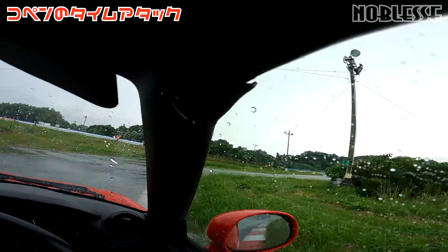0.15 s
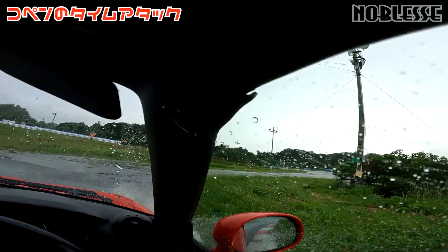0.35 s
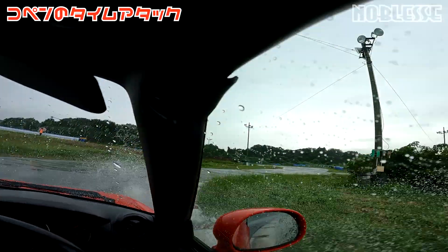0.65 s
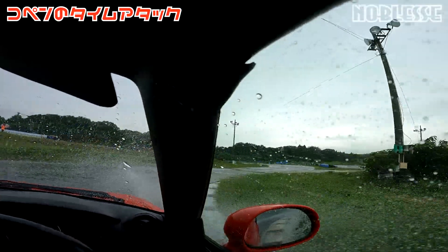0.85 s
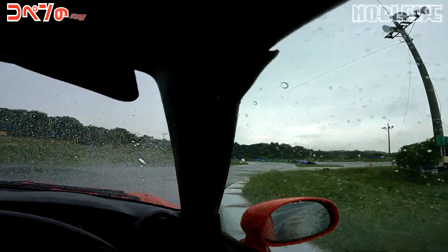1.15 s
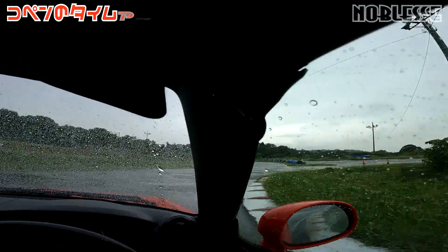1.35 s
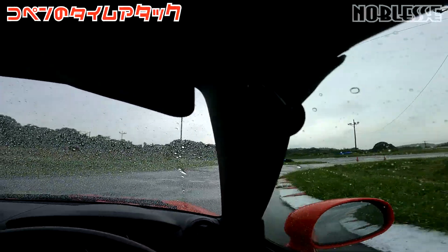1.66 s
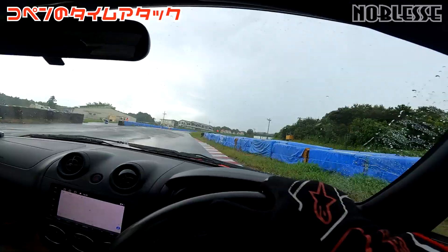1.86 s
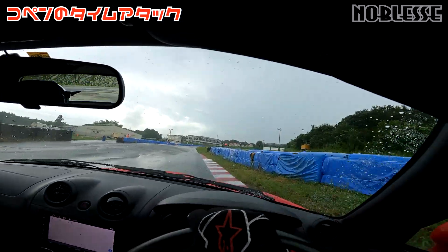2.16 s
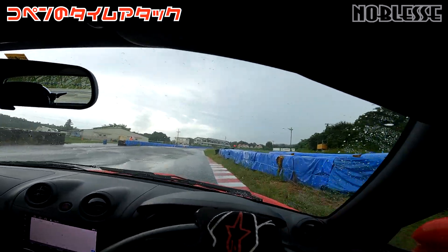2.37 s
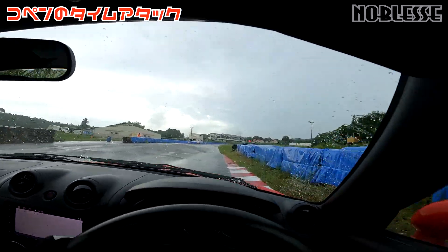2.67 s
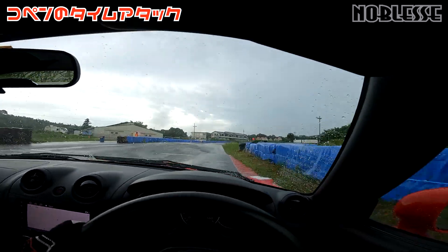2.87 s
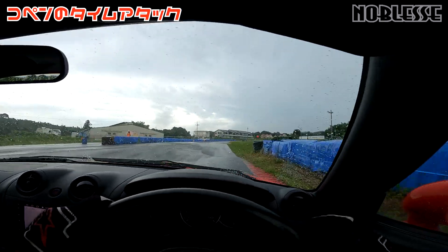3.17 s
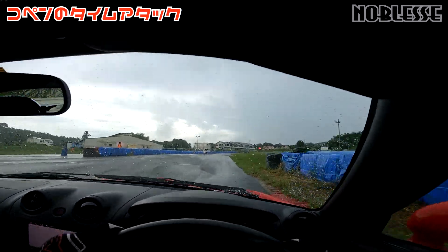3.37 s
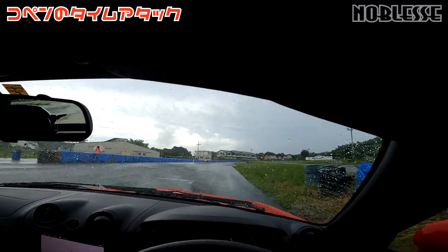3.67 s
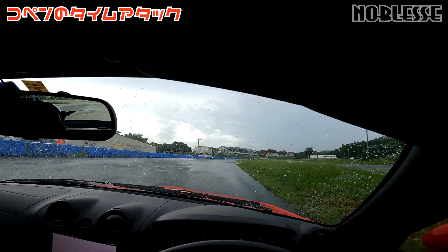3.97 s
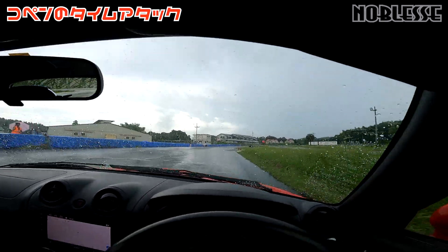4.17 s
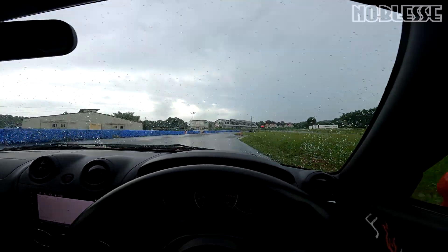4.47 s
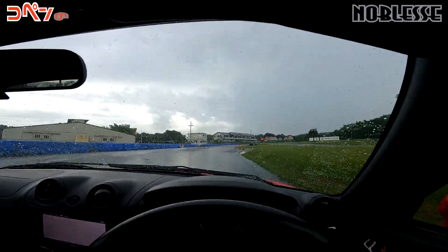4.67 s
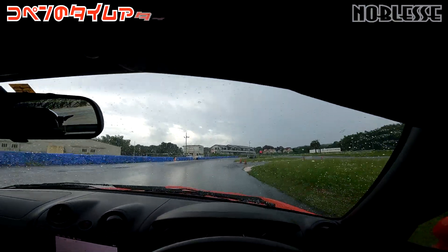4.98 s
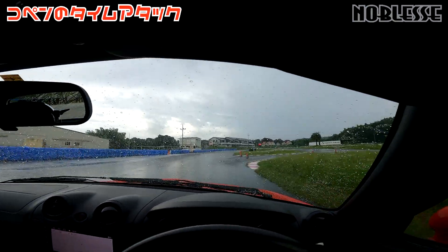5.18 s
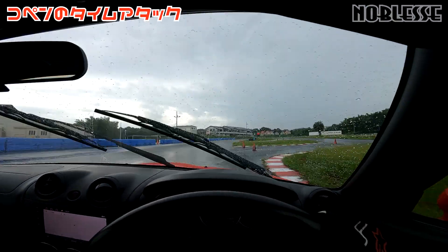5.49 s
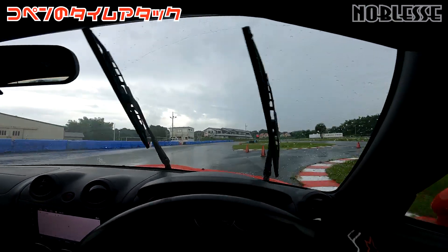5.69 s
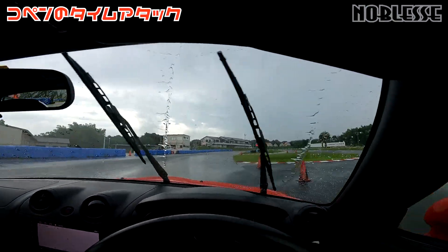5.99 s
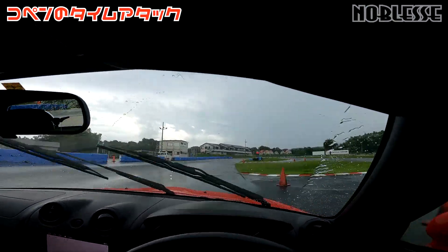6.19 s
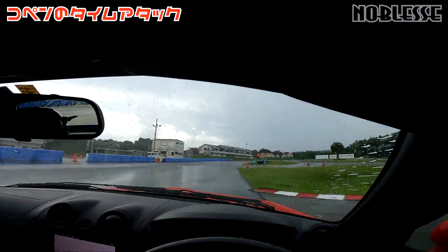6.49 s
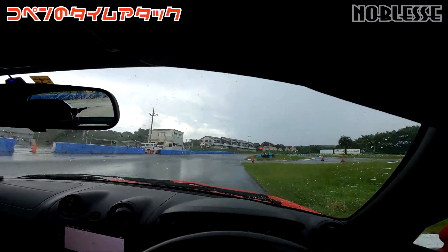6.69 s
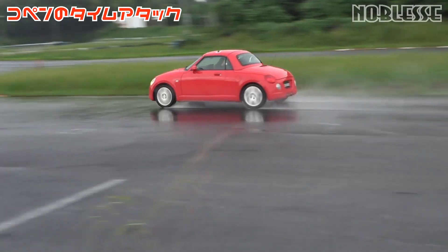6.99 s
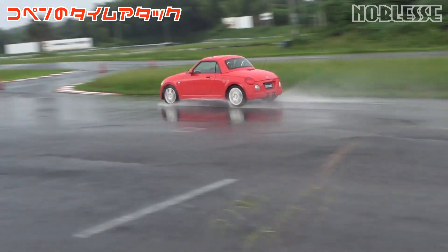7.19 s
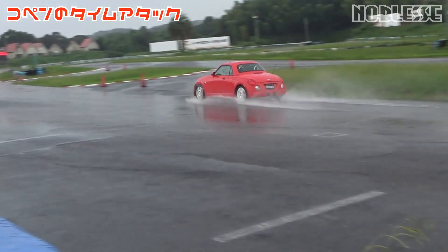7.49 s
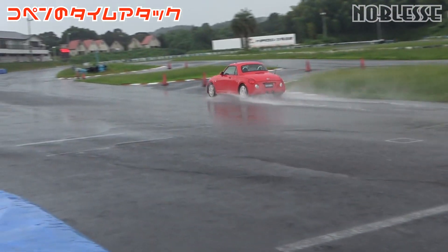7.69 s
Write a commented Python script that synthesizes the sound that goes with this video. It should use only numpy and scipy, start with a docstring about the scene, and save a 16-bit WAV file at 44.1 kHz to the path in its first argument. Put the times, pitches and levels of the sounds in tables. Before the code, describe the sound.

Inside a small turbo car on a flooded track, bumps thud and water splatters, then the engine booms upward until the wheels slip and the driver lifts.

```python
"""Inside a small four-cylinder turbo car on a wet track. First it shudders through a corner along a flooded
verge: bumps thud, trim rattles, water bursts on arch and door. Then it pulls up through the revs, firing
harmonics booming at exhaust resonances and a gear mesh whining; the wiper knocks as it reverses. Last, the
wheels spin up in standing water and the driver lifts. Throughout, filtered noise makes tyre drumming, spray
and suspension thrum; impulses make drops."""
import sys
import numpy as np
from scipy import signal
from scipy.fft import rfft, irfft
from scipy.io import wavfile
from scipy.ndimage import uniform_filter1d

SR = 44100
rng = np.random.default_rng(int(sys.argv[2]) if len(sys.argv) > 2 else 0)


def wav_record(signal):
    """Record a signal, one row per channel, as 16-bit PCM in the file named by sys.argv[1]."""
    frames = np.transpose(np.atleast_2d(signal))
    bounded = np.clip(frames, -1, 1)
    # unit amplitude maps onto the largest positive 16-bit level
    quanta = np.round(bounded * 32767).astype(np.int16)
    wavfile.write(sys.argv[1], SR, quanta)


N = 346185
TIME = np.arange(N) / SR

# engine speed without wheelspin: time_s, firing_hz
ENGINE_SPEED = [(0, 164.5), (1.88, 160.6), (2.1, 166.2), (2.33, 169.2), (2.45, 174.8), (2.72, 180.3),
                (2.87, 175.8), (3.07, 155.1), (3.35, 162.1), (3.85, 174), (4.45, 186.6), (4.85, 195.7),
                (5.02, 199.1), (5.16, 201.4), (5.38, 205.4), (5.6, 208.8), (6.42, 222.3), (7.12, 235),
                (7.24, 219.7), (7.3, 225.5), (7.35, 220.5), (7.43, 210.8), (7.53, 207.8), (7.62, 200),
                (7.68, 171), (7.73, 159), (7.79, 161), (7.85, 170.3)]
# throttle: time_s, load_db
ENGINE_LOAD = [(0, -9), (1.9, -13), (2, -4.5), (2.4, -3.5), (3.2, 0.5), (7.15, 0), (7.27, -11.5),
               (7.35, -4.5), (7.45, -11), (7.62, 1), (7.65, -5), (7.72, -3), (7.85, -9.5)]
# firing rate and harmonics: order (multiple of four-stroke cycle rate), relative_db
FIRING_ORDERS = [(4, 0.5), (8, -3), (12, -5), (16, -17.5)]
# exhaust and cabin air resonances: freq_hz, gain_db
EXHAUST_RESPONSE = [(153, -29.5), (165, -19), (172, -21.5), (178, -16.5), (186, -21.5), (195, -37),
                    (200, -24.5), (208, -15.5), (216, -17), (223, -11.5), (234, -21.5), (310, -33.5),
                    (342, -33), (368, -37.5), (383, -26), (402, -24.5), (427, -25), (440, -32), (465, -31),
                    (505, -43), (520, -34), (550, -39), (572, -31.5), (598, -37), (622, -37.5), (645, -36),
                    (700, -37.5), (803, -45), (821, -24), (834, -21), (849, -24.5), (860, -37),
                    (880, -28.5), (920, -46.5)]
# weaker overtones from unequal cylinders: order, relative_db
UNEVEN_ORDERS = [(2, -20.5), (3, -31), (5, -37), (6, -41), (7, -30.5), (9, -44), (10, -40), (11, -43),
                 (13, -52), (14, -51)]
# cabin response through the engine mounts: freq_hz, gain_db
CABIN_RESPONSE = [(80, -26.5), (125, -12.5), (165, -5), (220, 2.5), (255, -2.5), (278, -16), (293, -14.5),
                  (303, 3.5), (312, 1.5), (325, 1), (338, 4.5), (347, -0.5), (362, -15.5), (377, -2.5),
                  (392, -0.5), (404, 2), (414, -0.5), (450, 1.5), (495, 5), (535, -1.5), (590, 4),
                  (640, -1), (835, -3)]
# orders swelling as the engine strains on its mounts and grip varies: middle_s, length_s, order, level_db
ORDER_SHUDDERS = [(2.45, 0.49, 7, -30), (3.45, 1.16, 14, -42.5), (3.95, 1.1, 11, -40), (4.1, 0.86, 7, -29),
                  (7.165, 0.15, 4, -17.5), (7.2, 0.29, 3, -24.5), (7.228, 0.034, 4, -10.5),
                  (7.343, 0.096, 6, -27), (7.537, 0.17, 6, -19), (7.576, 0.18, 4, -24),
                  (7.688, 0.057, 4, -21)]
# revs flare as the wheels slip (rise in firing rate)
SPIN_MIDDLE_S, SPIN_LENGTH_S, SPIN_RISE_HZ = 7.163, 0.1016, 25.94
SPEED_WAVER = .0011  # share of engine speed
RASP_DB, RASP_SWELL_DB = -52, 4.5  # faint high orders, before load and the 5 / order fall


def engine(boom_flutter_db=0.5, boom_rough_rad=0.025, growl_flutter_db=1.6, growl_rough_rad=0.0029):
    """Four firings a cycle boom in the exhaust; other orders swell as they cross cabin resonances."""
    firing_hz, = curves(ENGINE_SPEED)
    load = undb(curves(ENGINE_LOAD)[0])
    cycle_hz = (firing_hz + SPIN_RISE_HZ * hump(SPIN_MIDDLE_S, SPIN_LENGTH_S)) / 4
    phase = 2 * np.pi * np.cumsum(cycle_hz * (1 + SPEED_WAVER * walk(25))) / SR

    def line(order, rough_rad, gain):
        """One order, phase shaken by uneven combustion; its gain follows load, its shudders do not."""
        shudder = sum(undb(db) * hump(s, length_s) for s, length_s, k, db in ORDER_SHUDDERS if k == order)
        angle = order * phase + rough_rad * walk(30) + rng.uniform(0, 2 * np.pi)
        return np.sqrt(2) * np.sin(angle) * (gain * load + shudder)

    boom = 0
    for n, (order, db) in enumerate(FIRING_ORDERS, 1):
        flutter = undb(db + n * boom_flutter_db * walk(24))
        boom = boom + line(order, n ** 2 * boom_rough_rad, response(EXHAUST_RESPONSE, order * cycle_hz) * flutter)
    growl = 0
    for order, db in UNEVEN_ORDERS:
        flutter = undb(db + growl_flutter_db * walk(12))
        gain = response(CABIN_RESPONSE, order * cycle_hz) * flutter
        growl = growl + line(order, order ** 2 * growl_rough_rad, gain)
    # valves and combustion
    rasp = sum(line(k, 0.79, undb(RASP_DB + RASP_SWELL_DB * walk(3)) * 5 / k) for k in range(17, 30))
    return boom + growl + rasp, phase


# gearbox casing resonances: freq_hz, width_hz, level_db
CASING_MODES = [(1660, 110, -60), (1782, 24, -55), (1866, 38, -45), (1906, 32, -47), (2195, 60, -55)]
WHINE_DB, LIFT_S = -61, 7.25  # level off resonance at 0 dB load; middle of the fade as drive comes off
MESH_ROUGH_RAD = .28


def gearbox(phase, flutter_db=1.0, fade_s=.2):
    """A gear pair meshes 19 times a crank turn, unevenly; sings under load and at casing resonances."""
    load_db, = curves(ENGINE_LOAD)
    mesh = 38 * phase  # two crank turns a cycle
    mesh_hz = np.gradient(mesh) * SR / (2 * np.pi)
    casing = sum(undb(db) / (1 + (2 * (mesh_hz - hz) / width) ** 2) for hz, width, db in CASING_MODES)
    fade = np.clip((LIFT_S - TIME) / fade_s + .5, 0, 1)
    drive = fade * undb(load_db + flutter_db * walk(25))
    return np.sqrt(2) * np.sin(mesh + MESH_ROUGH_RAD * walk(60)) * (undb(WHINE_DB) + casing) * drive


# kerbs and rough track: middle_s, length_s, extra_rumble_db, extra_roar_db
ROUGH_TRACK = [(.33, 0.98, 4, 1.5), (0.78, 0.55, 3, 7), (1.15, 0.66, 2.5, 5.5), (1.844, 0.45, 3, 4),
               (2.498, 0.84, 4, 5.5), (3.813, 0.61, 0.5, 5.5), (4.8, 0.75, 1, 2), (5.5, 0.94, 5.5, 3.5),
               (6.119, 0.61, 5, 0.5), (7.0, 0.34, 1, 3.5), (7.23, 0.25, -2, 5), (7.54, 0.2, 5, 4.5)]
# smooth track at cruise: straight_db, extra_full_side_load_db
RUMBLE_DB, ROAR_DB = (-30, 6.5), (-29.5, -0.5)
CRUISE_HZ, DB_PER_DOUBLING = 195, 3  # firing rate where those levels hold; rise with speed


def road():
    """Rumble and roar levels in dB: speed, side load and rough patches shift them."""
    speed_db = DB_PER_DOUBLING * np.log2(curves(ENGINE_SPEED)[0] / CRUISE_HZ)
    rumble_db = speed_db + cornering_db(*RUMBLE_DB)
    roar_db = speed_db + cornering_db(*ROAR_DB)
    for s, length_s, extra_rumble_db, extra_roar_db in ROUGH_TRACK:
        patch = hump(s, length_s)
        rumble_db = rumble_db + extra_rumble_db * patch
        roar_db = roar_db + extra_roar_db * patch
    return rumble_db, roar_db


# body panels: freq_hz, width_hz, relative_db, extra_full_side_load_db
PANEL_MODES = [(72, 29, -13.5, -3.5), (111.2, 23, -4, 9), (143.5, 30, -8, 4.5), (189.4, 42, -2, -3)]
# panels and cabin air, higher: freq_hz, width_hz, relative_db, extra_full_side_load_db
CABIN_AIR_MODES = [(249.5, 63, -0.5, 3.5), (320, 46, -2.5, 6.5), (387.6, 68.5, -3, 0), (490, 49, -8, -2.5),
                   (591, 68, -12, -9), (847, 61, -18.5, -1)]


def tyres(rumble_db, roar_db):
    """Road texture drives broad body and cabin resonances: low rumble, higher roar."""
    rumble = resonate(PANEL_MODES, sway_db=0.5) * undb(rumble_db)
    roar = resonate(CABIN_AIR_MODES, sway_db=2.5) * undb(roar_db)
    return rumble + roar


# water thrown by the tyres: time_s, level_db
WATER_FLOW = [(0, -45.5), (.5, -42), (1.2, -40.5), (1.3, -44.5), (2, -43.5), (2.9, -40.5), (3.6, -39),
              (4.3, -41), (5.4, -36), (6.6, -38), (7.1, -36.5), (7.85, -38)]
# spray through floor and glass: freq_hz, relative_db
SPRAY_SPECTRUM = [(300, -5), (600, 8.5), (950, 4.5), (1400, 2.5), (2000, 2), (2350, -0.5), (3600, -3.5),
                  (5000, -12), (7000, -20), (8300, -28.5), (9100, -36.5), (11100, -24.5), (12200, -36),
                  (12800, -38), (13500, -43)]


def spray(flicker_db=0.77, grain_db=-6, grain_spread_db=2.5, drops_per_s=2500):
    """Thrown water: a mist of hiss with dense droplets, its level flickering."""
    grain = unit(patter(drops_per_s, grain_spread_db))
    water = unit(colour(noise() + undb(grain_db) * grain, SPRAY_SPECTRUM))
    return water * undb(curves(WATER_FLOW)[0] + flicker_db * walk(45))


# suspension bumps: start_s, peak_db, strongest_hz
BUMP_EVENTS = [(.045, -15, 160), (.208, -14, 170), (.243, -14, 150), (.286, -10, 180), (.352, -14, 200),
               (.408, -10.5, 150), (.497, -10.5, 190), (0.517, -10.5, 120), (.595, -14, 160),
               (.658, -8, 410), (.701, -13, 280), (0.735, -16, 250), (.772, -11, 230), (.815, -9.5, 350),
               (0.891, -20, 115), (0.924, -9, 190), (1.018, -14, 100), (1.058, -16, 360),
               (1.109, -8.5, 200), (1.158, -9, 200), (1.179, -4.5, 230), (1.191, -7.5, 100),
               (1.319, -10, 210), (1.855, -11.5, 230), (7.259, -9, 310), (7.614, -14, 140)]
# body modes: freq_hz, relative_db, t60_s
THUD_MODES = [(119, -4, 0.13), (200, 4, 0.087), (328, 4.5, 0.1), (393, 2.5, 0.048), (500, -12, .05),
              (634, -16, 0.018)]
BUMP_FALL_DB_PER_OCTAVE = 16.5  # modes away from strongest_hz


def bumps():
    """Suspension blows thud through the body, each favouring modes near its own frequency."""
    out = np.zeros(N)
    for s, db, strongest_hz in BUMP_EVENTS:
        modes = []
        for hz, mode_db, t60_s in THUD_MODES:
            octaves = abs(np.log2(hz / strongest_hz))
            modes.append((hz, mode_db - BUMP_FALL_DB_PER_OCTAVE * octaves, t60_s))
        add(out, s, undb(db) * ring(modes, push_s=0.00033, grit=.3))
    return out


# hollow knocks: chassis clonks, and the wiper reversing at 5.936 s: start_s, peak_db
HOLLOW_KNOCKS = [(.663, -20), (5.936, -22.5), (7.551, -22), (7.667, -22)]
# their modes: freq_hz, relative_db, t60_s
HOLLOW_MODES = [(528, 1, .1), (723, 9, 0.11), (822, 2.5, 0.17)]


def hollow_knocks():
    """Chassis clonks and a wiper reversal: gritty short contacts ring hollow modes."""
    out = np.zeros(N)
    for s, db in HOLLOW_KNOCKS:
        add(out, s, undb(db) * ring(HOLLOW_MODES, push_s=0.0014, grit=3.3))
    return out


# loose trim: freq_hz, relative_db, t60_s
TRIM_RING = [(1000, -15, .015), (1395, 8, 0.041), (1610, 2.5, 0.028), (2056, 4, 0.033), (2505, -5, 0.025),
             (2850, -7, .02)]
TRIM_TILT_DB, TRIM_EVEN = 21, 0.23  # dB/octave per unit brightness; brightness with no tilt


def trim(bright):
    """Trim modes for one contact: brightness favours high modes; each mode's force varies randomly."""
    tilt_db = TRIM_TILT_DB * (bright - TRIM_EVEN)  # per octave
    lowest_hz = TRIM_RING[0][0]
    return [(hz, db + tilt_db * np.log2(hz / lowest_hz) + 2 * rng.standard_normal(), t60_s)
            for hz, db, t60_s in TRIM_RING]


# trim knocks: start_s, peak_db, brightness (0-1)
RATTLE_EVENTS = [(.459, -29.5, .2), (.516, -33, .2), (.563, -32, .1), (.583, -33, .5), (.625, -36, 0.66),
                 (.841, -32, .1), (0.867, -23, 0.33), (.896, -30, .2), (.936, -26.5, .1), (1.075, -32, .3),
                 (1.194, -29, 0.45), (1.223, -35, .3), (1.309, -34, .25), (1.365, -33, .3),
                 (1.663, -35, 0.23)]


def rattles():
    """Loose trim chatters: longer, scraping contacts ring its modes."""
    out = np.zeros(N)
    for s, db, bright in RATTLE_EVENTS:
        add(out, s, undb(db) * ring(trim(bright), push_s=0.0033, grit=3.9))
    return out


# a wheel runs along the flooded verge
VERGE_MIDDLE_S, VERGE_LENGTH_S, VERGE_WATER_DB = 0.68, 1.34, -46.5


def trim_buzz(rumble_db, taps_per_s=50, below_rumble_db=-24):
    """Four loose panels tap lightly along the verge, each at its own pitch; level follows body rumble."""
    taps = 0
    for _ in range(4):
        panel = ring(trim(TRIM_EVEN), push_s=0.0015, grit=4)
        taps = taps + signal.oaconvolve(patter(taps_per_s, spread_db=0.5), panel)[:N]
    return unit(taps) * undb(rumble_db + below_rumble_db) * np.sqrt(hump(VERGE_MIDDLE_S, VERGE_LENGTH_S))


# clots bursting on wheel arch and door: freq_hz, relative_db
SPLATTER_SPECTRUM = [(300, -11), (700, 0), (1500, 9.5), (2800, -4), (4000, -5), (6000, -15), (8300, -29),
                     (11000, -18), (13000, -38)]
# deeper puddles washing up the door: middle_s, length_s, level_db
PUDDLE_SURGES = [(.54, 0.28, -42.5), (0.676, .1, -47), (.9, 0.15, -44), (1.18, 0.21, -40)]
# surge on the door skin: freq_hz, relative_db
WASH_SPECTRUM = [(300, -6), (600, 5), (900, 3.5), (1500, -1.5), (2500, -4), (4000, -10), (7000, -27),
                 (13000, -50)]
SHOWER_PER_S = 7000  # droplets


def splatter(clots_per_s=75, clot_s=0.0049, drizzle=.4, wash_drizzle=.9):
    """Verge water bursts in quick, uneven droplet showers; deeper puddles add a fuller wash."""
    t = TIME[:SR // 12]
    starts = np.abs(patter(clots_per_s, spread_db=5.0))
    clots = unit(signal.oaconvolve(starts, t / clot_s * np.exp(-t / clot_s))[:N])
    droplets = patter(SHOWER_PER_S, spread_db=0.5)
    showers = unit(colour(droplets * (drizzle + clots), SPLATTER_SPECTRUM))
    verge = undb(VERGE_WATER_DB) * np.sqrt(hump(VERGE_MIDDLE_S, VERGE_LENGTH_S))
    surge = sum(undb(db) * hump(s, length_s) for s, length_s, db in PUDDLE_SURGES)
    wash = unit(colour(patter(SHOWER_PER_S, spread_db=2.0) * (wash_drizzle + clots), WASH_SPECTRUM))
    return showers * verge + surge * wash


# sheets of water on the floor: start_s, level_db
SLAP_EVENTS = [(.43, -45), (.476, -46), (.52, -40), (.556, -38), (.575, -41), (.598, -38), (0.619, -39),
               (.708, -41), (.66, -49), (.868, -43), (.94, -46), (1.12, -40), (1.165, -43), (1.19, -42),
               (1.222, -43), (7.456, -33), (7.489, -34), (7.506, -30), (7.551, -34.5), (7.667, -39)]


def slaps(slap_s=0.005):
    """Sheets of water slap the floor: spray-coloured noise, fast rise and decay."""
    t = TIME[:SR // 12]
    level = np.zeros(N)
    for s, db in SLAP_EVENTS:
        add(level, s, undb(db) * t / slap_s * np.exp(1 - t / slap_s))
    return level * unit(colour(noise(), SPRAY_SPECTRUM))


# largest drops and grit: start_s, level_db (before drop_trim_db)
LARGE_DROPS = [(.432, -34), (.577, -31), (1.367, -39), (1.434, -35), (2.242, -42), (3.303, -31),
               (3.318, -34), (3.592, -36), (4.004, -38), (4.103, -36), (4.259, -36), (4.36, -37),
               (4.466, -33), (4.785, -38), (5.028, -36), (5.799, -36), (6.055, -31), (6.407, -31),
               (6.628, -35), (7.174, -34), (7.514, -31), (7.667, -31.5)]
# single drop or grain on the wheel arch: freq_hz, relative_db
DROP_SPECTRUM = [(500, -8), (1500, 2.5), (3800, 7.5), (7000, -4.5), (8400, -10), (9100, -15.5),
                 (11000, -6.5), (12200, -20), (13000, -17.5), (15000, -32.5)]
SMALL_DROP_DB = -52  # smallest drops at mean flow, before colouring
SATELLITES_PER_S, SCATTER_S = 6000, .007  # droplets from a broken drop; their decay


def drops(spatter=1.0, drop_trim_db=-1, small_per_s=70):
    """Drops tick on the wheel arches and burst into satellite droplets."""
    t = TIME[:SR // 12]

    def burst():
        """One drop: a tick and its scattering satellites, peak 1."""
        satellites = (rng.random(len(t)) < SATELLITES_PER_S / SR) * rng.standard_normal(len(t))
        drop = (t == 0) + spatter * satellites * np.exp(-t / SCATTER_S)
        return drop / np.abs(drop).max()

    flow = unit(undb(curves(WATER_FLOW)[0]))
    small = flow * patter(small_per_s, spread_db=4.0)
    out = signal.oaconvolve(small, burst())[:N] * undb(SMALL_DROP_DB)
    for s, db in LARGE_DROPS:
        add(out, s, undb(db + drop_trim_db) * burst())
    return colour(out, DROP_SPECTRUM)


THRUM_DB = (-40, 4)  # straight, extra under full side load


def suspension_thrum(sway_db=2.5):
    """The suspension keeps up a deep thrum, stronger in corners."""
    modes = [(43.3, 22, 2, 1.5), (60.5, 17, 0.0, 1)]  # freq_hz, width_hz, relative_db, extra_side_load_db
    return resonate(modes, sway_db) * undb(cornering_db(*THRUM_DB))


# tyre side load: time_s, side_load (0-1)
SIDE_LOAD = [(0, 0.5), (.7, 0.7), (1.3, 0.7), (2.1, 0.6), (2.7, 0.8), (3.2, 0.1), (4.2, 0), (7.85, 0.11)]


def cornering_db(straight_db, corner_db):
    """A level shifted by the side load on the tyres."""
    side_load, = curves(SIDE_LOAD)
    return straight_db + corner_db * side_load


def resonate(modes, sway_db):
    """Noise in broad resonances, each swaying independently; side load shifts their balance; rms 1."""
    out, power = 0, 0
    for hz, width_hz, db, corner_db in modes:
        b, a = signal.iirpeak(hz, hz / (1.54 * width_hz), fs=SR)  # two passes narrow it to width_hz
        ringing = signal.lfilter(b, a, signal.lfilter(b, a, noise()))
        level_db = cornering_db(db, corner_db)
        out = out + ringing * undb(level_db + sway_db * walk(12))
        power = power + width_hz * undb(level_db) ** 2
    return unit(out / np.sqrt(power))


def ring(modes, push_s, grit):
    """Slightly detuned modes struck by a contact of time constant push_s, roughened by grit; peak 1."""
    t = TIME[:SR // 4]
    body = 0
    for hz, db, t60_s in modes:
        detuned_hz = hz * (1 + 0.0059 * rng.standard_normal())
        body = body + undb(db - 60 * t / t60_s) * np.sin(2 * np.pi * detuned_hz * t)
    contact = t * np.exp(-t / push_s) * (1 + grit * rng.standard_normal(len(t)))
    out = signal.fftconvolve(body, contact)[:len(t)]
    return out / np.abs(out).max()


def patter(per_s, spread_db):
    """Impacts at random moments, many small and a few large."""
    out = np.zeros(N)
    at = np.flatnonzero(rng.random(N) < per_s / SR)
    size = np.minimum(rng.exponential(size=N)[at], 4)
    out[at] = np.sign(noise()[at]) * undb(spread_db * size)
    return out


def hump(middle_s, length_s):
    """A smooth swell from 0 to 1 and back."""
    out = np.zeros(N)
    ends_s = [middle_s - length_s / 2, middle_s + length_s / 2]
    inside = slice(*np.searchsorted(TIME, ends_s))
    out[inside] = np.cos(np.pi * (TIME[inside] - middle_s) / length_s) ** 2
    return out


def walk(rate_hz):
    """Random levels held 1 / rate_hz s and slewed twice; spread near 1."""
    steps = 16
    held = np.repeat(rng.standard_normal(int(rate_hz * N / SR) + 2), steps)
    slewed = unit(uniform_filter1d(uniform_filter1d(held, steps), steps))
    return np.interp(TIME, np.arange(len(held)) / (rate_hz * steps), slewed)


def noise():
    """White noise, rms 1."""
    return rng.standard_normal(N)


def colour(x, points, size=1024):
    """Minimum-phase filter shaped by (freq_hz, gain_db) points; impulse response peak 1."""
    cepstrum = irfft(np.log(response(points, np.arange(size // 2 + 1) * SR / size)))
    cepstrum[1:size // 2] *= 2  # fold to make it causal
    cepstrum[size // 2 + 1:] = 0
    kernel = irfft(np.exp(rfft(cepstrum)))
    return signal.oaconvolve(x, kernel / np.abs(kernel).max())[:N]


def response(points, hz):
    """Gain at hz of (freq_hz, gain_db) points, interpolated over log frequency."""
    f, db = np.transpose(points)
    return undb(np.interp(np.log(hz + 1e-3), np.log(f), db))


def curves(table):
    """The columns of a timed table, one value a sample."""
    s, *columns = np.transpose(table)
    return [np.interp(TIME, s, c) for c in columns]


def add(track, s, sound):
    """Mix a sound in at s seconds."""
    start = int(s * SR)
    track[start:start + len(sound)] += sound[:N - start]


def undb(db):
    """Decibels to gain."""
    return np.exp(np.asarray(db) * (np.log(10) / 20))


def unit(x):
    """Scale to rms 1."""
    return x / np.sqrt(np.mean(x ** 2))


def scene():
    """Everything as heard in the cabin."""
    motor, phase = engine()
    rumble_db, roar_db = road()
    drive = motor + gearbox(phase)
    rolling = tyres(rumble_db, roar_db) + suspension_thrum()
    water = spray() + splatter() + slaps() + drops()
    knocks = bumps() + hollow_knocks() + rattles() + trim_buzz(rumble_db)
    return (drive + rolling + water + knocks)[None]


# microphone housing dips: freq_hz, width_hz
HOUSING_DIPS = [(9100, 400), (11930, 350)]
BASS_CUT_HZ, TOP_CUT_HZ = 31, 13500


def record(dry):
    """The microphone drops the deepest bass, notches the treble, rounds the peaks and cuts the top."""
    thin = signal.sosfilt(signal.butter(4, BASS_CUT_HZ, "high", fs=SR, output="sos"), dry)
    for hz, width_hz in HOUSING_DIPS:
        thin = signal.lfilter(*signal.iirnotch(hz, hz / width_hz, fs=SR), thin)
    rounded = np.tanh(.5 * thin) / .5
    return signal.sosfilt(signal.ellip(8, .2, 70, TOP_CUT_HZ, fs=SR, output="sos"), rounded)


dry = scene()
out = record(dry)
wav_record(out)
```